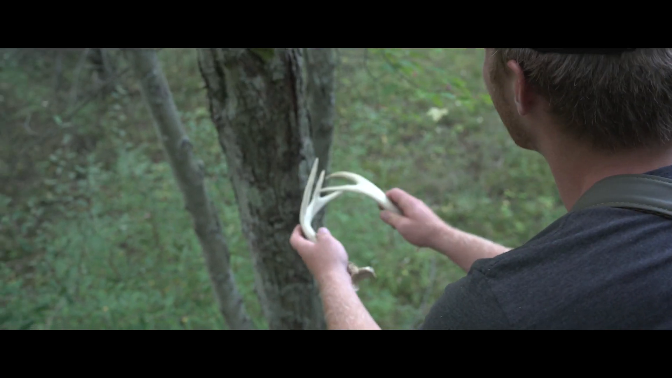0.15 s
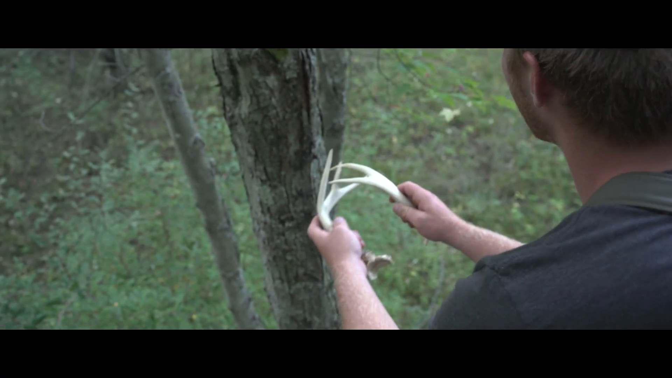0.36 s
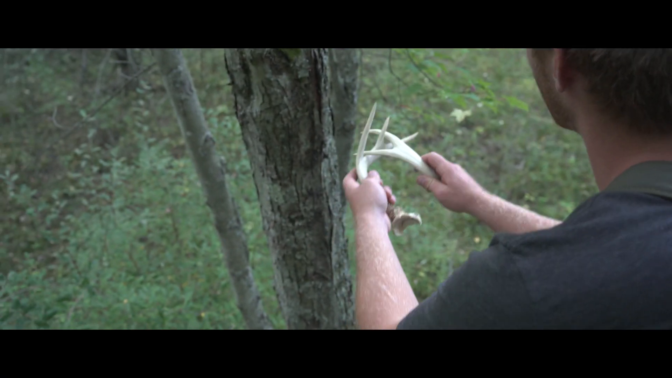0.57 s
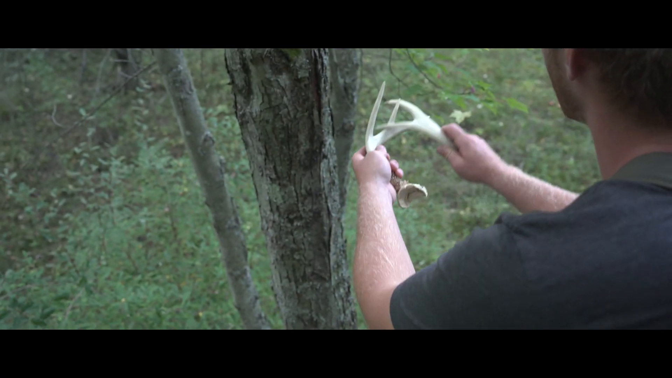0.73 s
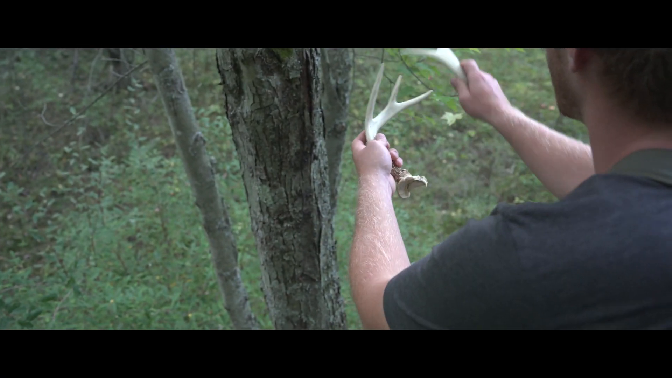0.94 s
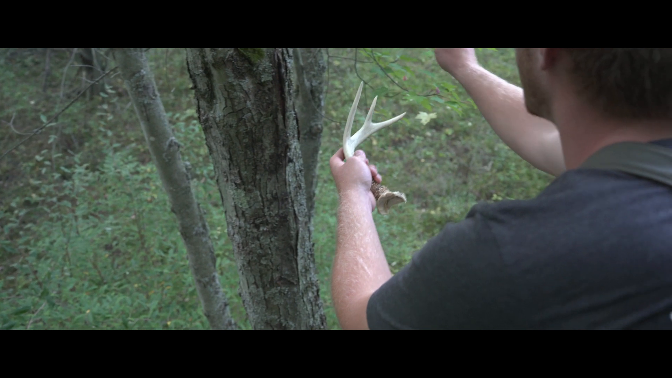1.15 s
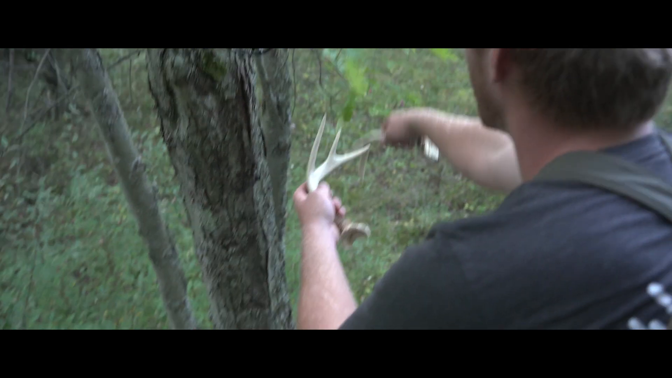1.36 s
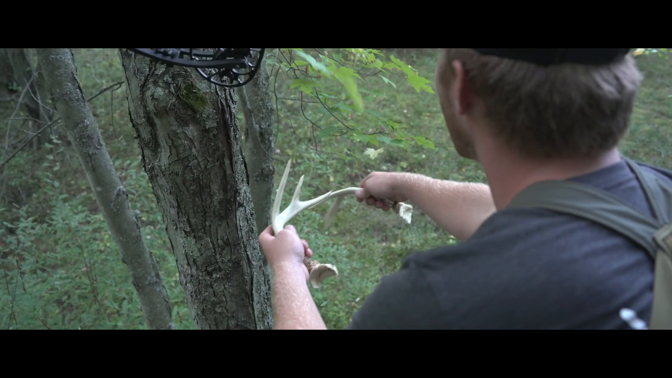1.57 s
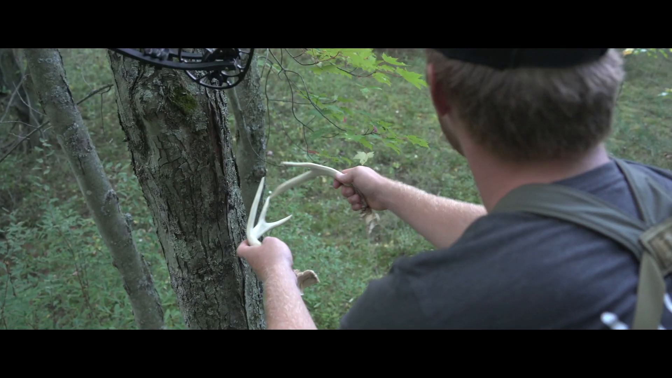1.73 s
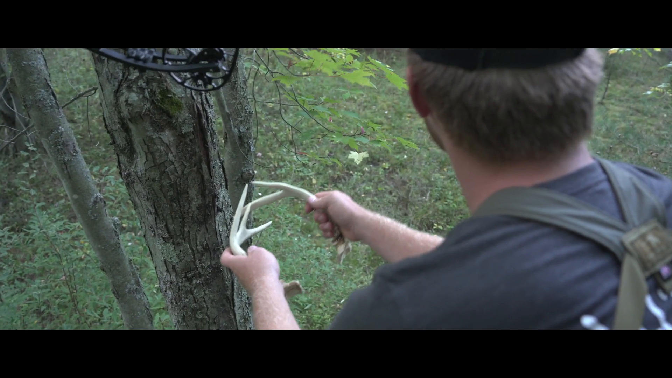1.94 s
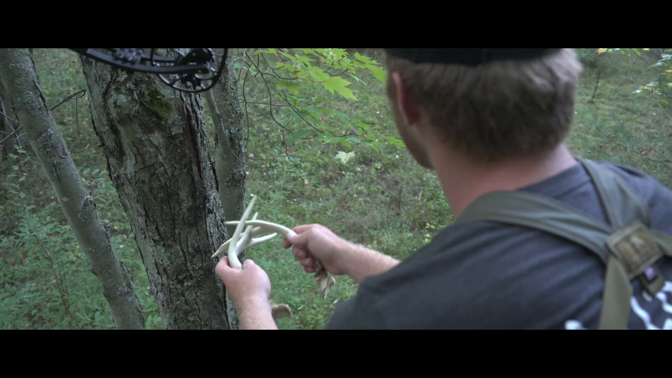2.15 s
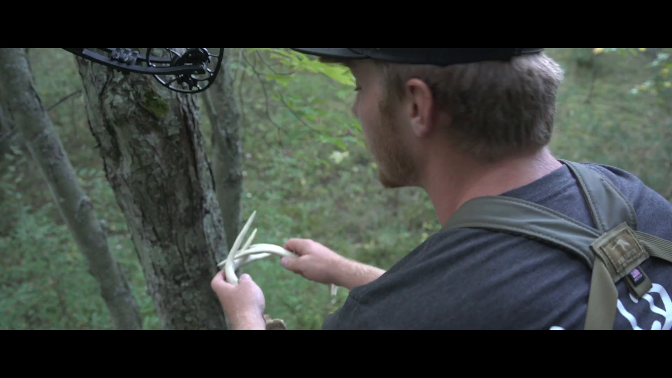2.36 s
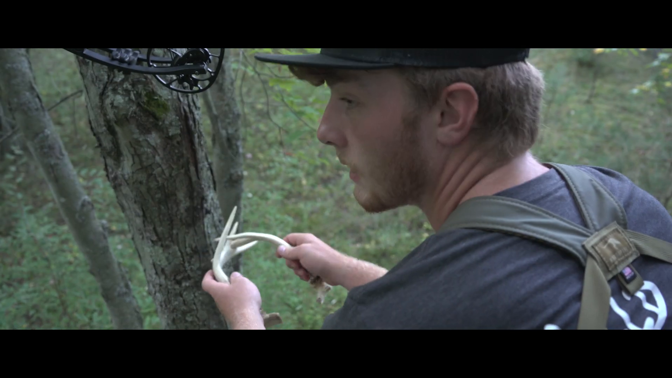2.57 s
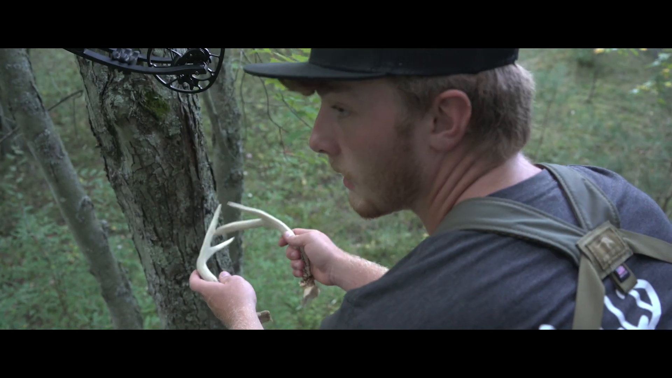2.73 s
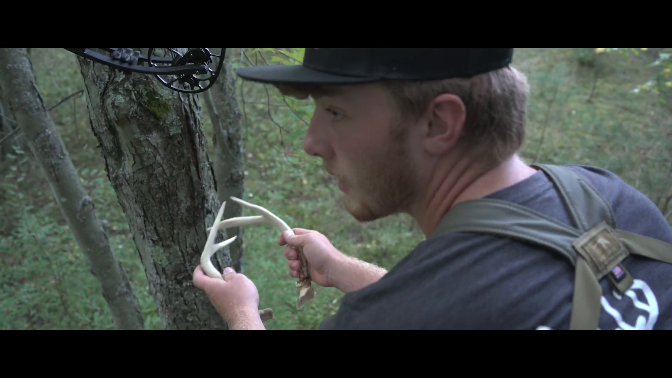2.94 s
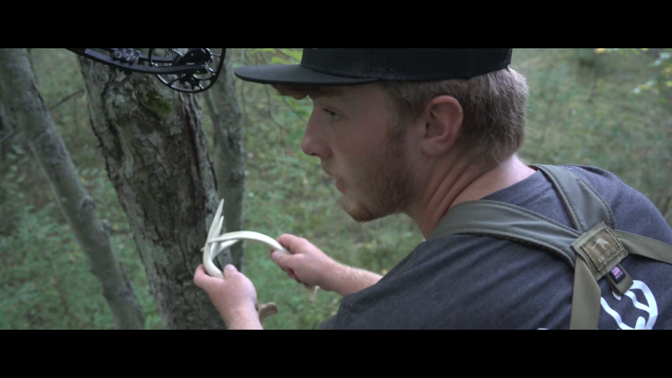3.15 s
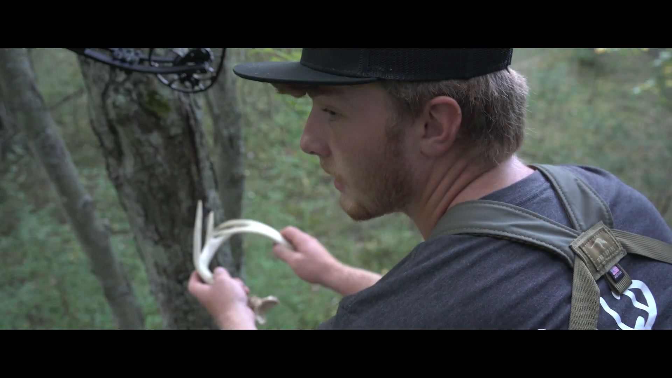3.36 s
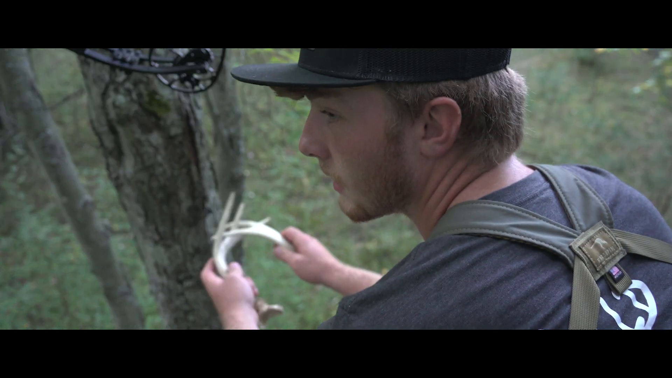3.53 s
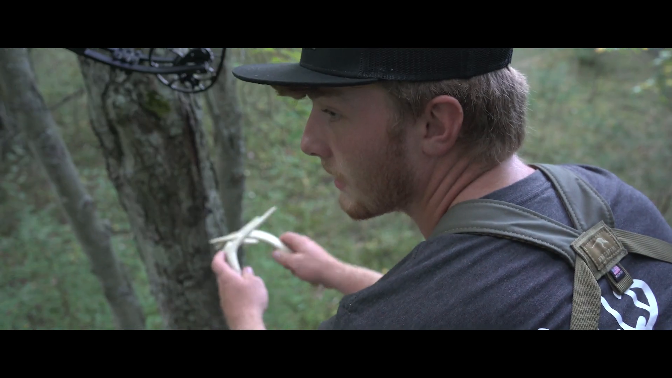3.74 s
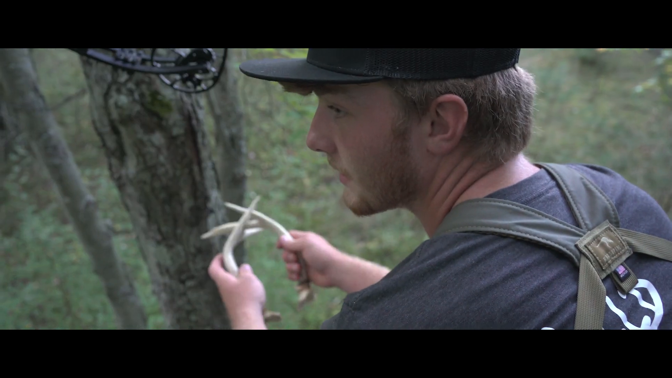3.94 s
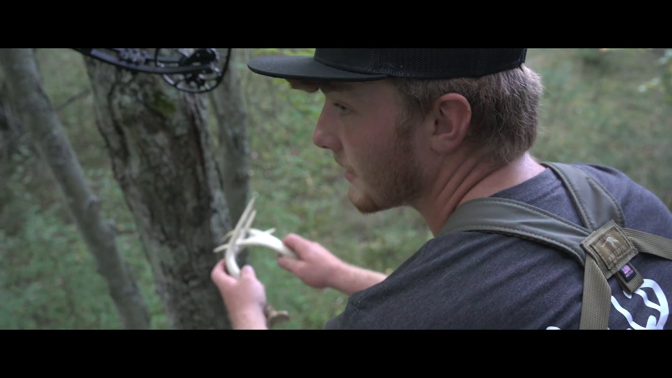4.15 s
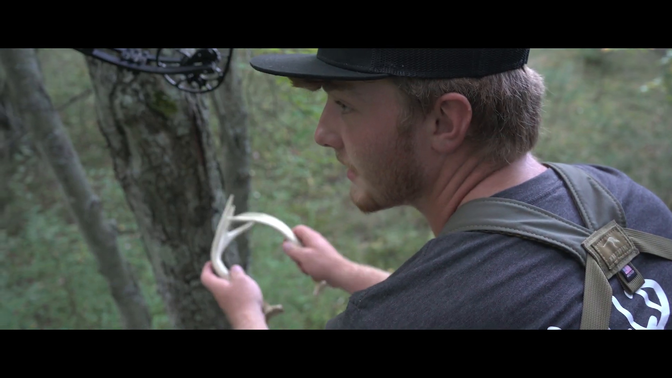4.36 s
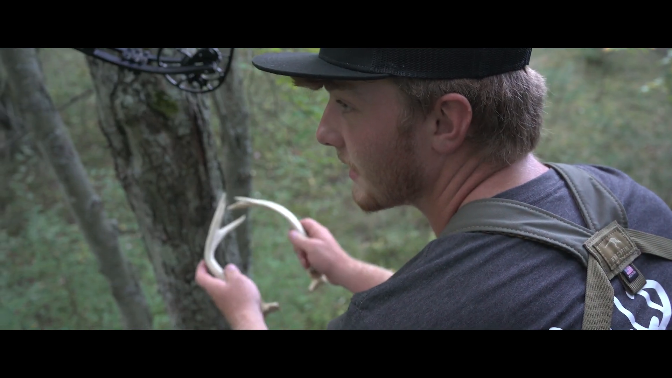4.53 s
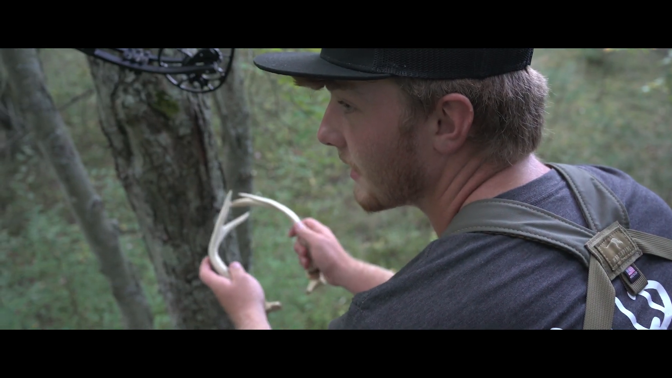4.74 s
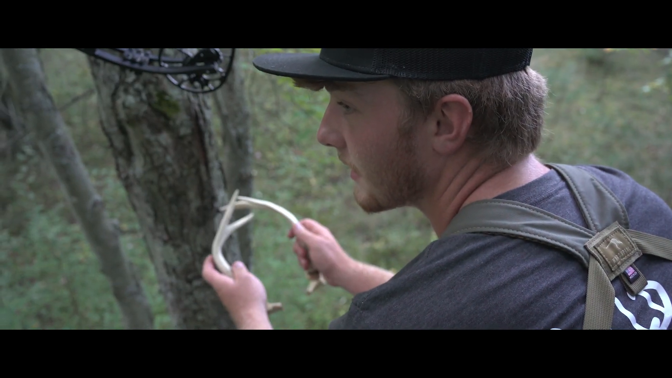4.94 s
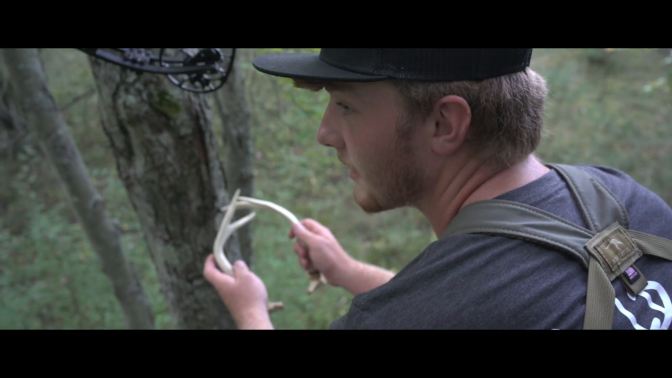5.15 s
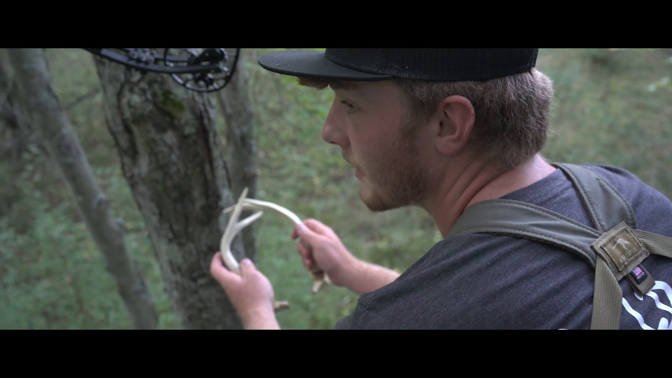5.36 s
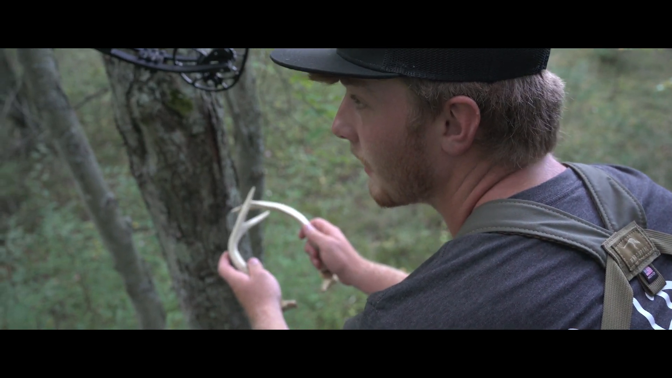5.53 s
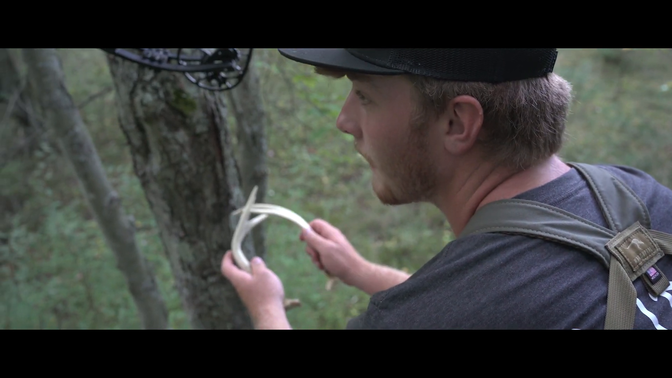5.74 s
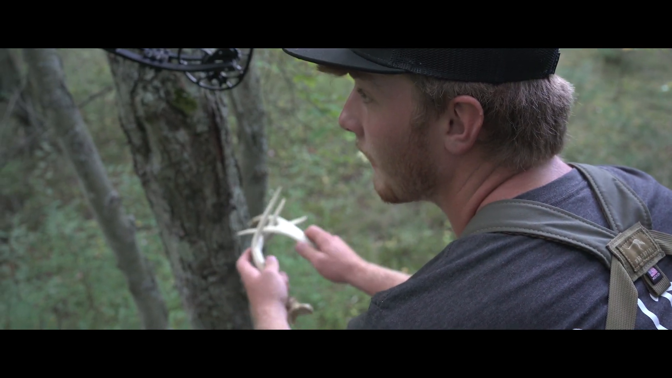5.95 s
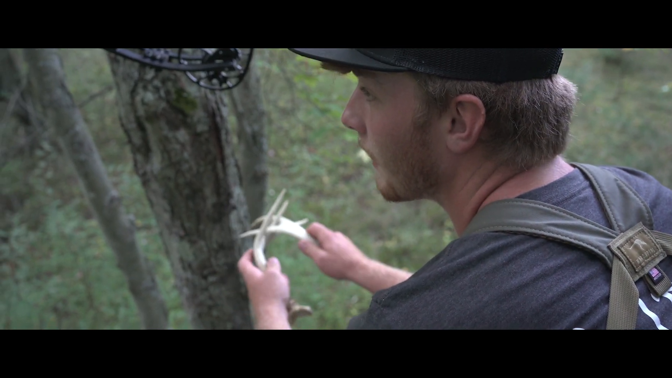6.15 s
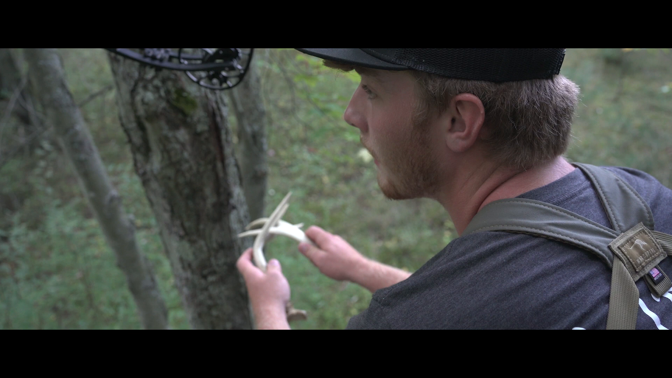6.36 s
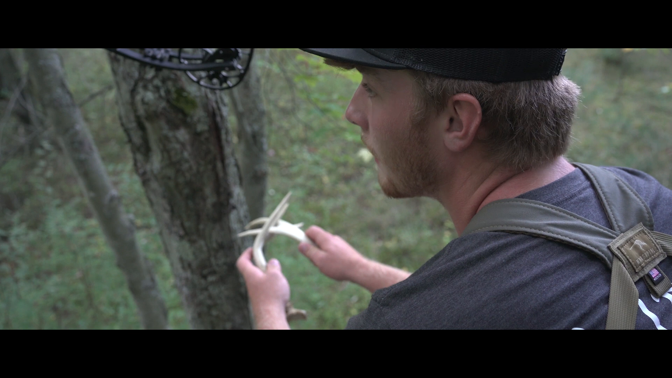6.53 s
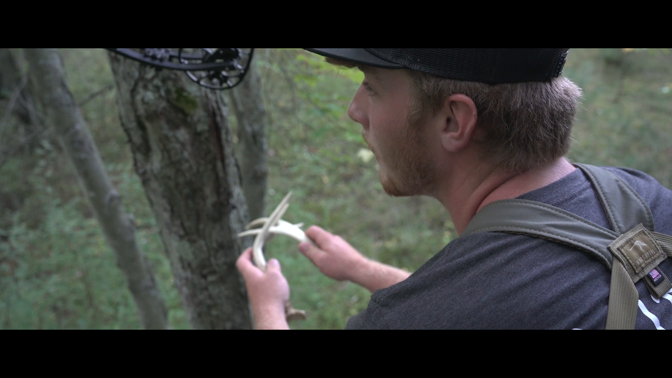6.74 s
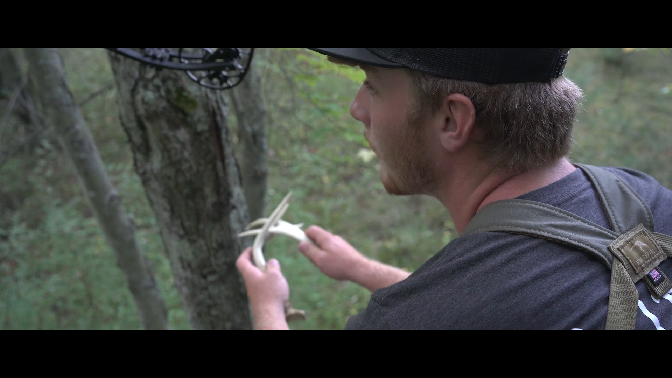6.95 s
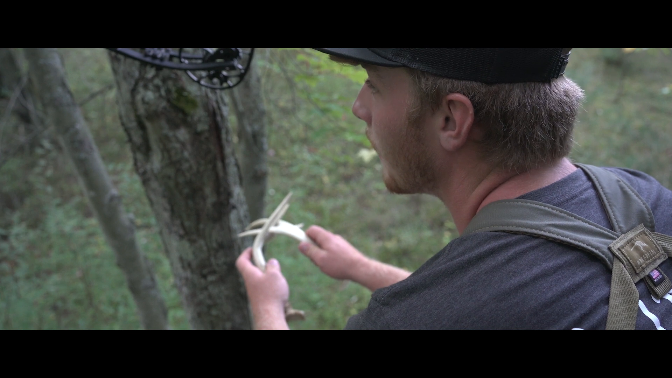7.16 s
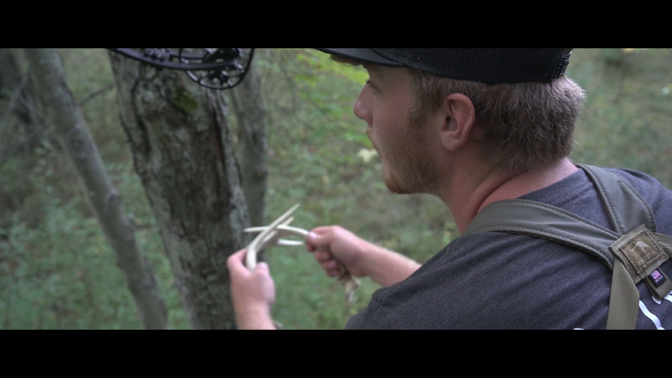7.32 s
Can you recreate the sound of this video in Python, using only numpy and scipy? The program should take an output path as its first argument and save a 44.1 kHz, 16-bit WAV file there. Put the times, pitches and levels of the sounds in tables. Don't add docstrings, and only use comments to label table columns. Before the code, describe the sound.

Dry antler tines rattle, click and drag against each other with pauses between clashes, while crickets shimmer continuously and faint wind and road rumble sit beneath.

```python
import sys
import numpy as np
from scipy import signal
from scipy.fft import rfft, irfft
from scipy.io import wavfile
from scipy.ndimage import uniform_filter1d

SR = 44100
rng = np.random.default_rng(int(sys.argv[2]) if len(sys.argv) > 2 else 0)


def bounce(signal):
    frames = np.transpose(np.atleast_2d(signal))
    limited = np.clip(frames, -1, 1)
    pcm = np.round(limited * 32767).astype(np.int16)
    wavfile.write(sys.argv[1], SR, pcm)


def rack_gain(trim_db):
    fader = np.asarray(trim_db, float)
    return 10 ** (fader / 20)


N = 330414
T = np.arange(N) / SR

# (time [s], force [dB], sharpness [dB], depth [dB], spot [Hz])
BLOWS = [(0.6562, -22.5, 12.5, -14, 3570), (0.6933, -25.5, 1.5, -23, 3802), (0.7126, -29.5, -7, -22, 2580),
         (2.2158, -11.5, -13.5, -23, 1810), (2.2321, -12.5, -29, -16, 1750), (2.435, -16, -1, -14, 3050),
         (2.4494, -19, -4, -13, 2900), (2.6468, -14.5, -0.5, -18, 5400), (2.6666, -17, 4.5, -17, 12500),
         (3.0447, -13.5, 1, -25, 12400), (3.0671, -16.5, -6, -27, 8500), (3.1178, -12.5, -6.5, -23, 7900),
         (3.1312, -16.5, -14, -22, 3543), (3.6107, -11.5, -20, -13.5, 3240),
         (3.6542, -9, -15.5, -23.5, 2490), (3.8086, -14.5, -15, -25, 2821), (4.1992, -15.5, -1, -12, 5314),
         (4.3584, -13.5, -19, -15, 2900), (5.9208, -14.5, -7, -18, 4426), (5.9543, -8, -27, -24.5, 2900),
         (5.9705, -13.5, -3.5, -24.5, 4816), (5.9859, -25.5, -5, -21.5, 4188),
         (7.3359, -16, -14.5, -7, 3100), (7.4884, -20.5, -0.5, -12.5, 12460)]
# (time [s], force [dB], sharpness [dB], depth [dB], spot [Hz])
REBOUNDS = [(0.7058, -34, -8, -6, 3900), (0.7178, -33, -5, -25, 3700), (2.259, -21, -25, -19, 2301),
            (2.2813, -25, -33, -12, 2500), (2.299, -23, -37, -13, 2306), (2.457, -34, -18, -30, 2308),
            (2.464, -26.5, -23, -33, 4100), (2.6778, -23, -3, -39, 5500), (2.684, -22, -10, -25, 5500),
            (2.6917, -22, -17, -23, 5500), (2.699, -25, -20, -25, 2900), (2.712, -27, -15, -25, 3500),
            (2.7165, -27, -16, -23, 5500), (2.7806, -30.5, -18.5, -27.5, 2600),
            (3.0792, -19.5, -22, -34, 5200), (3.088, -21, -3, -29, 5200), (3.0942, -36, -4, -28, 5600),
            (3.099, -30, -25, -30, 2900), (3.1135, -27, -2, -21, 2900), (3.1285, -26.5, 4, -17, 5200),
            (3.136, -23.5, -8, -10, 3600), (3.6348, -27, -16, -0.5, 1900), (3.648, -38, -10, -10, 3500),
            (3.668, -22.5, -8.5, -16, 4200), (3.816, -32.5, -19.5, 1, 2500),
            (4.211, -27, -5.5, -29.5, 5200), (4.218, -25, -5, -17, 4300), (5.9355, -27, -25.5, -20.5, 2900),
            (5.9645, -22.5, -19.5, -15.5, 2900), (5.975, -18.5, -11, -24.5, 4400),
            (5.993, -24.5, -9.5, -28, 4300), (6.002, -22.5, -10.5, -27, 2950), (6.009, -26, -10, -15, 2950),
            (7.341, -12.5, -30, -35, 2250), (7.349, -23.5, -33, -44, 2310)]
# (time [s], force [dB], sharpness [dB], depth [dB], spot [Hz])
TOUCHES = [(0.1397, -38, -16, -10, 2300), (0.1484, -40, -24, -34, 2300), (2.3811, -38, -37, -4, 1794),
           (2.562, -29, -17, -3.5, 2300), (2.5893, -36.5, -23, -3, 2300), (3.1824, -37.5, 1, -3, 2300),
           (3.246, -44.5, 8.5, -1, 2600), (3.3353, -46, -20, -3, 2900), (3.353, -33.5, -8.5, -18, 2575),
           (3.363, -32, -25, -14, 2900), (3.3869, -26, -21, -15.5, 2570), (3.4294, -40.5, -20, -13, 1787),
           (3.827, -29, -30, -31, 2578), (3.9782, -40.5, -11, -2, 2604), (4.0947, -37, -26, -3, 1787),
           (4.134, -37.5, -33, -10, 1798), (5.702, -41, -18.5, -32, 2780), (0.7839, -52, -14, -20, 2545),
           (.8002, -38, -5, -23, 2560), (0.8221, -35, -10, -26, 1685), (0.8243, -37, -12, -24, 2600),
           (0.8452, -32, -13, -24, 2300), (0.8676, -40, -4, -20, 2400), (0.8927, -32, -4, -20, 3900),
           (0.912, -25.5, 4, -28, 4400), (0.917, -34, 0, -19, 3940), (0.9178, -31, 4, -14, 2900)]
# (time [s], first gap [s], force [dB], sharpness [dB], spot [Hz])
CHATTER = [
    (2.6063, .009, -37, -22.5, 2300),
    (5.7244, .0115, -43.5, -21, 2800),
]
# (time [s], length [s], pressure [dB], sharpness [dB])
DRAGS = [(-.01, 0.056, -35.5, -20), (0.033, 0.093, -48.5, -15), (0.102, 0.086, -44.5, -23),
         (0.72, 0.072, -52, -5), (0.766, 0.068, -42, -14), (0.795, 0.039, -31.5, -17),
         (0.82, 0.083, -33.5, -10), (0.869, 0.061, -37.5, -4), (0.903, 0.028, -27.5, -5.5),
         (2.293, 0.038, -30.5, -43), (2.356, 0.081, -33, -33), (2.439, 0.035, -21.5, -20.5),
         (2.667, 0.07, -26, -20), (2.715, 0.075, -34.5, -16), (2.773, 0.025, -30, -13),
         (2.761, 0.033, -40.5, -3), (3.105, .012, -35, -14), (3.062, 0.11, -35.5, -6),
         (3.138, 0.16, -37.5, -14.5), (3.635, 0.08, -29, -23), (3.714, 0.09, -49, -19),
         (3.806, 0.038, -32, -37), (3.866, 0.1, -46, -35), (3.946, 0.057, -39, -35),
         (3.983, 0.05, -35.5, -46), (4.047, 0.16, -40, -37), (4.199, 0.035, -27, -12.5),
         (5.756, 0.14, -50, -14), (5.92, 0.051, -27.5, -33), (5.965, 0.066, -23, -19),
         (7.338, 0.12, -38, -24), (7.435, 0.057, -35, -27)]
# (time [s], pitch [Hz])
CONTACT = [(0, 2360), (.77, 2499), (.8, 2300), (.815, 1700), (.865, 1700), (.885, 2600), (.895, 4000),
           (.93, 3060), (2.3, 1777), (2.45, 3096), (2.7, 3380), (2.74, 3505), (2.78, 2491), (3.15, 3900),
           (3.7, 2604), (4.0, 1899), (5.8, 2700), (7.4, 2900)]
# (pitch [Hz], level [dB], t60 [s])
BEAM = [(684, -14, 0.15), (916, -2, 0.033), (1008, -4, 0.048), (1140, -8.5, 0.036), (1333, -4.5, 0.035),
        (1565, -13, 0.044), (405, -15.5, 0.046)]
# (pitch [Hz], level [dB], t60 [s])
TINES = [(1780, -11, 0.022), (1915, -12.5, 0.04), (2103, -6, 0.025), (2202, -13, 0.038), (2248, -17, 0.03),
         (2580, -17.5, 0.026), (2700, -9.5, 0.015), (2320, -33.5, 0.072)]
# (pitch [Hz], level [dB], t60 [s])
TIPS = [(2923, -5, 0.031), (3230, -3, 0.012), (3536, -4.5, 0.031), (3946, -7.5, 0.014), (4200, -8.5, 0.043),
        (4460, -6.5, 0.018), (5060, -4.5, 0.017), (5600, -9, 0.027)]
# (pitch [Hz], level [dB], t60 [s])
CRACK = [(6240, 4.5, 0.0057), (6650, -1, 0.008), (7280, 0, 0.012), (8210, -4.5, 0.012), (8580, -8, 0.009),
         (9260, -8.5, 0.0093), (11360, -16.5, 0.012), (13180, -18.5, 0.015), (14320, -19.5, 0.0023)]
# (pitch [Hz], level [dB], t60 [s])
FREE_TINE = [(1695, -5.5, 0.034), (2414, -0.5, 0.016), (2706, -5, 0.039), (3970, -6, 0.041)]
# (time [s], level [dB], pitch [Hz], fall [dB per octave])
SNAPS = [(0.178, -33.5, 598, 18), (0.234, -29, 3710, 7), (0.495, -26.5, 600, 21.5),
         (0.6214, -27.5, 600, 17), (1.335, -15.5, 7000, 2.5), (1.3477, -12, 3700, 22),
         (1.363, -17, 9000, 12), (5.1876, -23, 900.6, 11), (1.047, -32.5, 500, 12), (1.113, -30, 794, 13),
         (1.2, -28, 494, 15), (1.277, -28.5, 500, 18), (1.728, -30, 500, 16), (1.806, -37, 2300, 5),
         (2.005, -32, 800, 9), (2.137, -31, 2600, 13), (2.147, -36, 2300, 11), (5.594, -35, 700, 8),
         (5.835, -34, 710, 9.5), (4.675, -34.5, 896, 8), (5.198, -36.5, 590, 9)]
# (time [s], level [dB])
RAP = (1.6628, -23.5)
# (pitch [Hz], level [dB], t60 [s])
BUCKLE = [(886, 0.5, 0.013), (1230, -6.5, 0.017), (2030, 1, 0.0083), (2900, -12, 0.015)]
# (time [s], level [dB])
RUSTLE = [
    [(0, -81), (.2, -79), (.4, -67), (.47, -63.5), (.5, -69), (.55, -70.5), (.65, -67.5)],
    [(1.05, -68), (1.1, -67.5), (1.308, -72), (1.314, -48), (1.395, -49), (1.41, -61), (1.45, -59.5),
     (1.55, -65), (1.62, -76)],
    [(2.9, -95), (2.97, -60.5), (3.03, -74)],
]
# (frequency [Hz], level [dB per Hz])
CLOTH = [(120, -45), (200, -5), (558, 7), (899, 2), (1400, 2), (5040, 1), (13800, -8), (16000, -4.5)]
# (time [s], level [dB])
CHORUS = [(0.0, -49.5), (0.94, -45), (2.13, -48.5), (2.56, -48), (2.77, -47), (7.49, -48)]
# (frequency [Hz], level [dB per
# Hz])
AIR = [(30, -23), (50, -3.5), (88, -14), (130, 2), (155, -4.5), (178, -1.5), (230, -12.5), (500, -15.5),
       (1000, -22.5), (2500, -29), (7000, -29.5), (12000, -37.5), (15750, -32), (16000, -62)]
# (time [s], level [dB])
WIND = [(0, -82), (.55, -50), (1.0, -55), (1.5, -45.5), (2.3, -63), (2.6, -50), (3.2, -64), (4.6, -52),
        (5.15, -55), (5.25, -41), (5.4, -41.5), (5.75, -66.5), (7.49, -60.5)]
# (time [s], level [dB], fade [dB per s])
THUDS = [
    (.55, -50, 134),
    (1.42, -51, 69.5),
    (5.23, -46, 58.5),
]

LOOSE_S, REGRIP_S = .5, 1.5
MAIN_HZ = 2205


def antlers():
    return band(knocks() + drags(), 416.0, SR / 2)


def knocks(favour_db=9.5, main_db=13.5, detune=0.015, crack_detune=0.0663, grip=0.2,
           snap_db=-8.0, snap_t60=0.0021, snap_follow=0.21):
    groups = (BEAM, TINES, TIPS, CRACK, FREE_TINE)
    sizes = [len(modes) for modes in groups]
    hz, mode_db, t60 = np.transpose(sum(groups, []))
    signs = (-1) ** (np.arange(len(hz)) // 2)
    main = np.abs(hz - MAIN_HZ) < 60
    detune = np.where(hz > CRACK[0][0] - 1, crack_detune, detune) * np.where(main, .5, 1)
    t = np.arange(2400, dtype=np.float32)[:, None] / SR
    out = np.zeros(N + len(t))
    hits = BLOWS + REBOUNDS + TOUCHES + chatter()
    chance = rng.standard_normal((len(hits), 3, len(hz)))
    puffs = rng.standard_normal((len(hits), 400)) * rack_gain(-60 * t[:400, 0] / snap_t60)
    puffs = band(puffs, 6400.0, 18000.0, order=1)
    for (s, force, sharp, depth, spot_hz), (spot, tune, hold), puff in zip(hits, chance, puffs):
        loose = LOOSE_S < s < REGRIP_S
        tines, tips, crack = contact_levels(force, sharp, tips_db=-2, follow=0.32)
        free = tines if loose else -200
        favoured = favour_db * np.exp(-(np.log(hz / spot_hz) / 0.13) ** 2) + 1.8 * spot
        lead = main_db * (not loose)
        group_db = np.repeat([force + depth, tines, tips, crack, free], sizes)
        level_db = group_db + mode_db + np.where(main, lead, favoured)
        decay = np.log(1000) / (t60 * np.exp(grip * np.minimum(hold, .4)))
        pole = 2j * np.pi * hz * (1 + detune * tune) - decay
        start = round(s * SR)
        out[start:][:len(t)] += np.exp(pole.astype(np.complex64) * t).imag @ (signs * rack_gain(level_db))
        out[start:][:len(puff)] += rack_gain(crack + snap_db + snap_follow * sharp) * puff
    return out[:N]


def chatter(shrink=.82, loss_db=1.0, depth_db=-23.5):
    hits = []
    for s, gap, force, sharp, spot_hz in CHATTER:
        for k in range(7):
            elapsed = gap * (1 - shrink ** k) / (1 - shrink)
            hits.append((s + elapsed, force - loss_db * k, sharp, depth_db, spot_hz))
    return hits


def drags(slide_db=3.5, crack_damp=0.45, main_db=6.5, favour_db=5.5, favour_width=0.1):
    pressure = drag_pressure()
    live = uniform_filter1d(1. * (pressure[0] > 0), size=6001) > 1e-6
    (tines, tips, crack), t = pressure[:, live], T[live]
    slips = rms_one(grains(per_s=1400.0, spread_db=1.0))[live]
    contact_hz = in_time(CONTACT)[0][live]
    loose = (t > LOOSE_S) * (t < REGRIP_S)
    driven = [(BEAM, tines * rack_gain(-23.0)), (TINES, tines * rack_gain(-10.0)), (TIPS, tips * rack_gain(-7.5)),
              (CRACK, crack * rack_gain(-1.0)), (FREE_TINE, tines * rack_gain(-4.0) * loose)]
    rung = 0
    for modes, force in driven:
        steady = sum(rack_gain(2 * level_db) * t60 for hz, level_db, t60 in modes) * SR / (4 * np.log(1000))
        damp = crack_damp if modes is CRACK else 1
        for hz, level_db, t60 in modes:
            gripped_db = main_db * np.exp(-(np.log(hz / MAIN_HZ) / .03) ** 2) * (t > REGRIP_S)
            favoured_db = favour_db * np.exp(-(np.log(hz / contact_hz) / favour_width) ** 2)
            mode_db = level_db + gripped_db + favoured_db + slide_db * drift(22.0, t)
            sliding = rack_gain(mode_db) / np.sqrt(steady * damp)
            own_slips = np.roll(slips, rng.integers(N))
            rung = rung + ring(own_slips * force * sliding, hz, t60 * damp)
    out = np.zeros(N)
    out[live] = rung
    return out


def drag_pressure(rise=0.21):
    out = np.zeros((3, N))
    for s, length, pressure_db, sharp_db in DRAGS:
        span = slice(max(round(s * SR), 0), round((s + length) * SR))
        swell = np.sin(np.pi / 2 * np.interp((T[span] - s) / length, [0, rise, 1], [0, 1, 0]))
        levels_db = contact_levels(pressure_db, sharp_db, tips_db=3.5, follow=0.59)
        out[:, span] += swell * rack_gain(levels_db)[:, None]
    return out


def contact_levels(force_db, sharp_db, tips_db, follow):
    return force_db, force_db + tips_db + follow * sharp_db, force_db + sharp_db


def snaps(trim_db=-6.5):
    out, t = np.zeros(N), np.arange(2000) / SR
    # (low [Hz], high [Hz], centre [Hz], t60 [s])
    bands = [(300.0, 650.0, 600, .03), (1200.0, 2830.0, 1900, .02),
             (2700.0, 5700.0, 3700, .012), (5500.0, 24000.0, 9000, .008)]
    for low_hz, high_hz, centre_hz, t60 in bands:
        puffs = rng.standard_normal((len(SNAPS), len(t))) * rack_gain(-60 * t / t60)
        for (s, peak_db, hz, fall), puff in zip(SNAPS, band(puffs, low_hz, high_hz, order=1)):
            level_db = peak_db - fall * abs(np.log2(centre_hz / hz)) + trim_db
            out[round(s * SR):][:len(t)] += rack_gain(level_db) * puff / np.abs(puff).max()
    return out


def rap():
    s, rap_db = RAP
    click = rack_gain(rap_db) * (np.arange(SR // 10) == 0)
    out = np.zeros(N)
    for k, (hz, level_db, t60) in enumerate(BUCKLE):
        out[round(s * SR):][:len(click)] += (-1) ** k * rack_gain(level_db) * ring(click, hz, t60)
    return out


def rustle(trim_db=11.0):
    crackle = grains(per_s=18000.0, spread_db=4.5) * rack_gain(3.6 * drift(45.35))
    return rack_gain(trim_db) * gains_in_spans(RUSTLE)[0] * coloured(crackle, CLOTH)


def trunks(x):
    t = np.arange(SR // 2) / SR
    noise = rng.standard_normal((3, len(t)))
    near = noise[0] * rack_gain(-60 * t / .06) * (t > .004)
    leaves = band(noise[1], 5700.0, 12000.0) * rack_gain(-60 * t / 0.15) * (t > .003)
    edge = band(noise[2], 300.7, 6990.0, order=1) * (t > .02) * np.clip((.48 - t) / .06, 0, 1)
    trees = edge * rack_gain(-60 * t / .6)
    parts = (-15.5, near), (-24.0, leaves), (-36.5, trees), (-46.0, edge)   # (level [dB], echo)
    echo = sum(rack_gain(db) * part / np.linalg.norm(part) for db, part in parts)
    return signal.oaconvolve(x, echo)[:N]


def chorus(centre_hz=5247.0, above_hz=220.0, below_hz=450.0, octave_db=-21.0, octave_tilt_db=-4.5):
    out = 0
    for place, pace, start in zip(np.linspace(-2.8, 2.3, 17), *rng.random((2, 17))):
        hz = centre_hz + place * (above_hz if place > 0 else below_hz)
        strokes = T * (59.0 + 14.0 * pace) + start
        shape, phase = wing_pulses(strokes, hz, duty=0.98, sag_hz=354.0, uneven_db=2.0)
        overtone = rack_gain(octave_db + octave_tilt_db * place) * np.sin(2 * phase)
        out = out + rack_gain(-3.6 * place ** 2) * shape * (np.sin(phase) + overtone)
    return rms_one(smear(out, t60=.05, wet=0.45, count=4))


def near_cricket():
    out = 0
    for hz, per_s, level_db in ((3340.0, 40.21, 0), (3190.0, 38.6, -10.0)):
        shape, phase = wing_pulses(per_s * T - .12, hz, duty=.75, sag_hz=380.0, uneven_db=1.5)
        out = out + rack_gain(level_db) * shape * np.sin(phase)
    return rms_one(smear(out, t60=0.26, wet=0.47))


def ticker(level_db=-71.0):
    strokes = 22.7 * (T - 6.555)
    shape, phase = wing_pulses(strokes, 6300.0, duty=.3, sag_hz=1100.0, uneven_db=1.5)
    strong = rack_gain(4.0 * np.cos(np.pi * strokes))
    return rack_gain(level_db) * rms_one(smear(shape * strong * np.sin(phase), t60=.1, wet=0.51))


def wing_pulses(count, hz, duty, sag_hz, uneven_db):
    stroke = np.floor(count + .5).astype(int)
    place = count - stroke
    start, size = rng.standard_normal((2, 700))[:, stroke % 700]
    shape = rack_gain(uneven_db * size) * np.maximum(1 - (2 * place / duty) ** 2, 0) ** 2
    stroke_s = (T[-1] - T[0]) / (count[-1] - count[0])
    cycles = hz * T - sag_hz * stroke_s * place ** 2 / 2 + start
    return shape, (2 * np.pi * (cycles % 1)).astype(np.float32)


def smear(x, t60, wet, count=1, sway_per_s=9.0):
    t = np.arange(SR // 4) / SR
    paths = 0
    for tail in rng.standard_normal((count, len(t))) * rack_gain(-60 * t / t60):
        sway = drift(sway_per_s) if count > 1 else 1
        paths = paths + signal.oaconvolve(x, tail)[:N] * sway
    return (1 - wet) * rms_one(x) + wet * rms_one(paths)


def air(level_db=-53):
    return rack_gain(level_db + 0.25 * drift(2.7)) * coloured(rng.standard_normal(N), AIR)


def wind(mount_db=-66, rise_db_per_s=170.0):
    sway_db, = in_time(WIND)
    jolts = rack_gain(mount_db)
    for s, db, fade in THUDS:
        jolts = jolts + rack_gain(db - np.maximum(fade * (T - s), rise_db_per_s * (s - T)))
    sway, thud = rng.standard_normal((2, N))
    lumps = rack_gain(sway_db + 0.5) * rms_one(band(sway, 8.0, 22.6))
    return lumps + jolts * rms_one(band(thud, 28.0, 85.0))


def rms_one(x):
    return x / np.sqrt(np.mean(x ** 2) + 1e-20)


def in_time(rows):
    s, *columns = np.transpose(rows)
    return [np.interp(T, s, c) for c in columns]


def gains_in_spans(tables):
    total = 0
    for rows in tables:
        inside = (T >= rows[0][0]) & (T <= rows[-1][0])
        total = total + rack_gain(np.array(in_time(rows))) * inside
    return total


def drift(rate, t=T):
    return np.interp((t * rate) % 399, np.arange(400), rng.standard_normal(400))


def ring(clicks, hz, t60):
    r, w = rack_gain(-60 / (t60 * SR)), 2 * np.pi * hz / SR
    return signal.lfilter([0, np.sin(w)], [1, -2 * r * np.cos(w), r * r], clicks + 1e-18)


def band(x, low_hz, high_hz, order=2):
    edges = np.clip([low_hz, max(high_hz, 1.1 * low_hz)], 5, .48 * SR)
    return signal.sosfilt(signal.butter(order, edges, "band", fs=SR, output="sos"), x)


def coloured(x, spectrum):
    hz, level_db = np.transpose(spectrum)
    log_hz = np.log(np.arange(N // 2 + 1) * SR / N + 1)
    return rms_one(irfft(rfft(x) * rack_gain(np.interp(log_hz, np.log(hz), level_db)), N))


def grains(per_s, spread_db):
    sizes = rack_gain(spread_db * np.minimum(rng.exponential(1, N), 4)) * rng.choice([-1, 1], N)
    return sizes * (rng.random(N) < per_s / SR)


def scene():
    close = antlers() + snaps() + rap()
    chorus_db, = in_time(CHORUS)
    insects = rack_gain(chorus_db) * chorus() + rack_gain(-59) * near_cricket() + ticker()
    return (close + trunks(close) + rustle() + insects + air() + wind())[None]


def roll_off(x):
    return signal.sosfilt(signal.butter(12, 17020, fs=SR, output="sos"), x)


def record(dry):
    rounded = 0.54 * np.tanh(dry / 0.57)
    top_cut = signal.cheby2(10, 60, 16700, fs=SR, output="sos")
    return roll_off(signal.sosfilt(top_cut, rounded))


dry = scene()
out = record(dry)
bounce(out)
```